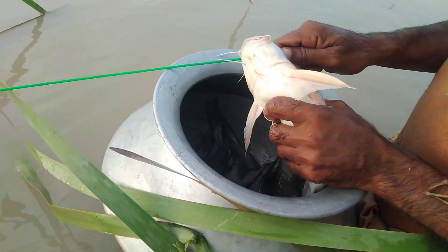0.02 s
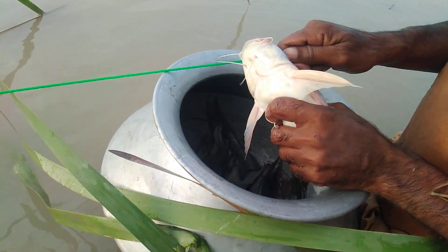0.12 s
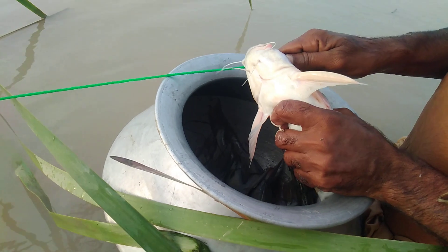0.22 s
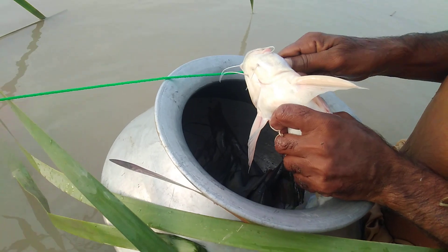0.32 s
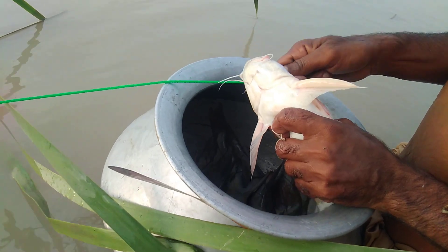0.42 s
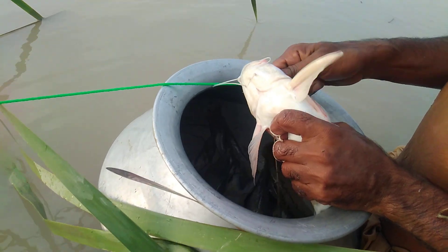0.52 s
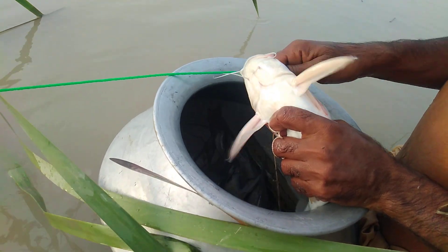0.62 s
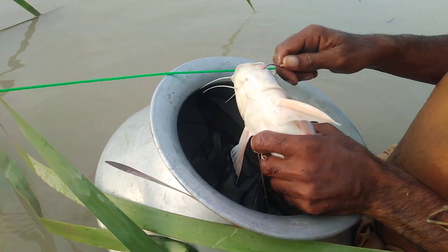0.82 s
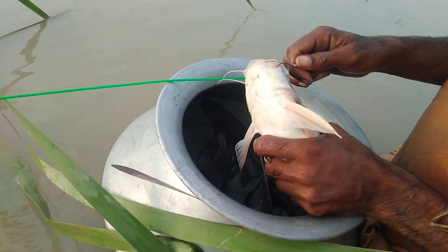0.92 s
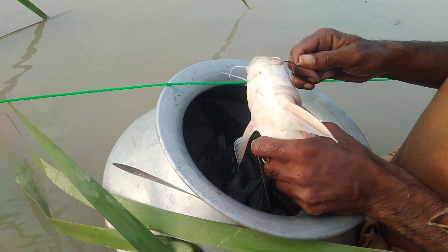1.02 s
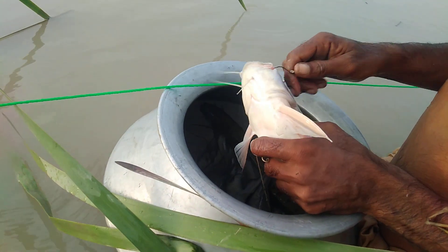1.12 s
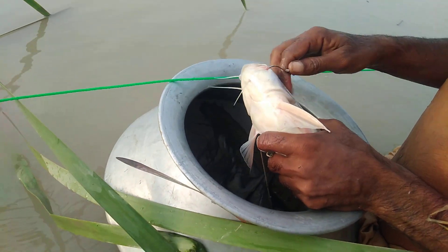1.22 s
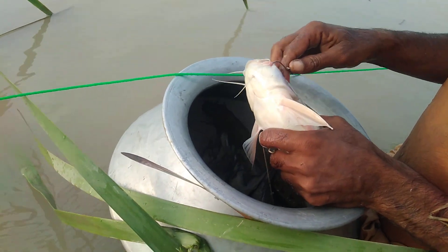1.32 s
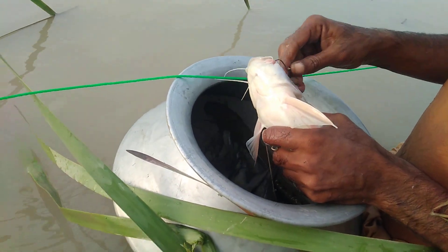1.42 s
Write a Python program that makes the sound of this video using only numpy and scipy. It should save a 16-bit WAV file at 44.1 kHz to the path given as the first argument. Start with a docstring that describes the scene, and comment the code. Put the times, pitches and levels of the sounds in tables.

```python
"""Light wind, small rubs and a soft knock on an aluminium pot lead into three gritty croaks of a catfish.
The fish, held over the pot at the water's edge, grinds its fin spines in their sockets.
Each croak is a run of ridge clicks that speeds up and slows down, ringing the body and shedding grit.
Hands and fishing line tick, rub and knock on the pot, which rings as a set of dying sines.
Wind is shaped noise with gusts on the microphone; a far insect is a narrow band of noise that pulses."""
import sys
import numpy as np
from scipy import signal
from scipy.fft import rfft, irfft, next_fast_len
from scipy.io import wavfile

SR = 44100
rng = np.random.default_rng(int(sys.argv[2]) if len(sys.argv) > 2 else 0)


def materialize(psi):
    """Save the field psi as 16-bit PCM at rate SR to the path in sys.argv[1].

    A 1-D psi becomes a single channel; in a 2-D psi each row is a channel.
    """
    bounded = np.clip(np.atleast_2d(psi).T, -1, 1)
    quanta = np.round(bounded * 32767).astype(np.int16)
    wavfile.write(sys.argv[1], SR, quanta)


N = 63945  # length in samples
T = np.arange(N) / SR  # time in seconds

# The tones of the metal pot. Each row: pitch in Hz, relative level in dB, time to fall by 60 dB in seconds.
POT_TONES = [(1098, -4, 0.12), (1232, 3, 0.2), (1400, -19, 0.17), (1444, -2, 0.082), (1616, -3, 0.12),
             (1703, 9, 0.066), (1700, -7, 0.1), (2210, -4.5, 0.027), (2304, -12, 0.13), (2720, -6, 0.081),
             (3267, -7.5, 0.12), (3610, -4, 0.066), (4345, -10, 0.14)]


def from_db(db):
    """Turn decibels into a gain."""
    return 10 ** (np.asarray(db) / 20)


def at_level(x, db, length):
    """Scale a sound so that its energy, spread over length seconds, has this rms level in dB."""
    rms = np.sqrt(np.sum(x ** 2) / (length * SR) + 1e-20)
    return x * from_db(db) / rms


def colour(x, points):
    """Filter with a spectrum given as (Hz, dB) points, reacting as early as possible (minimum phase)."""
    size = next_fast_len(2 * N) // 2 * 2
    hz, db = np.transpose(points)
    bins_hz = np.arange(size // 2 + 1) * SR / size
    gains = from_db(np.interp(np.log(bins_hz + 1), np.log(hz), db))
    # folding the cepstrum forward in time leaves no sound ahead of its cause
    cepstrum = irfft(np.log(gains))
    cepstrum[1:size // 2] *= 2
    cepstrum[size // 2 + 1:] = 0
    return irfft(rfft(x, size) * np.exp(rfft(cepstrum)))[:N]


def resonance(x, hz, width):
    """Let one band of width Hz resonate, with a gain of about one at its top."""
    r = np.exp(-np.pi * width / SR)
    feed = [(1 - r * r) / 2, 0, (r * r - 1) / 2]
    feedback = [1, -2 * r * np.cos(2 * np.pi * hz / SR), r * r]
    return signal.lfilter(feed, feedback, x + 1e-18)


def ring(x, modes):
    """Each click sets the modes ringing as dying sines, neighbours in opposite sense."""
    out = 0
    for k, (hz, db, t60) in enumerate(modes):
        r = np.exp(-np.log(1000) / (t60 * SR))
        w = 2 * np.pi * hz / SR
        tone = signal.lfilter([0, np.sin(w)], [1, -2 * r * np.cos(w), r * r], x + 1e-18)
        out = out + (-1) ** k * from_db(db) * tone
    return out


def fade(x, seconds):
    """Give each click an exponential tail that falls to 37 percent in the given seconds."""
    return signal.lfilter([1], [1, -np.exp(-1 / (seconds * SR))], x + 1e-18)


def clicks(times, sizes):
    """Place single-sample clicks at the given times."""
    places = np.round(np.asarray(times) * SR).astype(int)
    return np.bincount(np.clip(places, 0, N - 1), sizes, N)


def hump(middle, spread):
    """Swell and fall smoothly as a bell curve with this standard deviation in seconds."""
    return np.exp(-((T - middle) / spread) ** 2 / 2)


def noise(points):
    """Make coloured noise with an rms of one."""
    return at_level(colour(rng.standard_normal(N), points), 0, N / SR)


def ridge_times(start, fastest, end, first, top, last, jitter):
    """The spine speeds up and slows down; a click falls each time a ridge slips."""
    arch_up, arch_down = 0.91, 1.7  # radians of a sine that the speed follows on each side of its top
    t = np.linspace(start, end, num=400)
    speeding_up = t < fastest
    away = np.interp(t, [start, fastest, end], [1, 0, 1])  # 0 at the top speed, 1 at either end
    arch = np.where(speeding_up, arch_up, arch_down)
    slowest = np.where(speeding_up, first, last)
    rate = top - (top - slowest) * (np.sin(arch * away) / np.sin(arch)) ** 2
    passed = (np.cumsum(rate) - rate[0]) * (t[1] - t[0])  # ridges gone by so far
    ridges = np.arange(64) + jitter * rng.standard_normal(64)  # slightly uneven spacing
    return np.interp(ridges[ridges < passed[-1]], passed, t)


def fish_body(push, thump, index):
    """The clicks ring the fish's body and the air in the pot; each slip also gives a soft low push."""
    # Body resonances. Each row: pitch in Hz, width in Hz, relative dB in the first, second and third croak.
    body_bands = [(435, 144, 6.5, 4.5, -5.5), (761, 136, 7.5, 10, -19), (843, 204, 0.5, 9, 7),
                  (1093, 294, -2, -2.5, -2.5), (1433, 170, 0.5, 4, 1), (1772, 254, -4, -2, -0.5),
                  (2067, 143, -1.5, -9.5, -6), (2574, 57, 3, -5, 1), (3640, 470, -14.5, -38, -51)]
    out = 0
    for k, (hz, width, *gains) in enumerate(body_bands):
        out = out + (-1) ** k * from_db(gains[index]) * resonance(push, hz, width)
    pot_air = from_db(2) * resonance(push, 207, 8.3)
    soft_push = from_db(-2) * resonance(thump, 221.5, 117)
    return out + pot_air + soft_push


def fin_grit(scrape, tilt_db):
    """Each ridge snaps cleanly, rings the bone alike and sheds a short burst of noise."""
    # Sound of the grinding ridges. Each row: pitch in Hz, relative level in dB before the croak's tilt.
    grit_spectrum = [(400, -40), (1100, -20), (2400, -13), (3100, -13.5), (4500, -16.5), (5250, -27),
                     (5650, -37), (6500, -10), (7400, -2), (8600, -14), (9700, -11), (11900, -4),
                     (12800, -13), (13800, 0.5), (15600, 3)]
    grit_decay, bone_decay, bone_tail_decay = 0.00067, 0.0016, 0.0088  # seconds to fall to 37 percent
    bone_db, bone_tail_db, snap_db = -9, -6, 11  # bone and snap beside the bursts, tail beside the bone
    bursts = fade(scrape, grit_decay) * rng.standard_normal(N)
    bone_fade = np.exp(-T / bone_decay) + from_db(bone_tail_db) * np.exp(-T / bone_tail_decay)
    # one noise pattern serves every click, so the bone answers each the same way
    bone = signal.fftconvolve(scrape, rng.standard_normal(N) * bone_fade)[:N]
    tilted = [(hz, db + tilt_db * np.log2(hz)) for hz, db in grit_spectrum]
    return colour(bursts + from_db(bone_db) * bone + from_db(snap_db) * scrape, tilted)


def croak(index):
    """Ridge clicks of both fins drive the body and the grit of one spine stroke."""
    # Speed of each spine stroke. Each row: start, fastest moment and end in seconds,
    # then first, top and last speed in clicks per second.
    strokes = [(.498, .523, .556, 280, 398, 185), (.593, .624, .673, 305, 436, 215),
               (.707, .741, .790, 265, 456, 200)]
    # Voice of each stroke. Each row: body level in dB, grit level in dB, grit tilt in dB per octave.
    voices = [(-40.5, -38, -1.3), (-37, -33, -1.5), (-38.5, -35, 1)]
    # Roughness of each stroke. Each row: timing jitter as a share of a ridge, other fin's level in dB.
    roughness = [(.03, -16), (.055, -4), (.006, -30)]
    # Swell of each stroke. Each row: level at the start in dB, end of the rise in seconds,
    # start of the fall in seconds, level at the end in dB.
    swells = [(-4, .508, .542, -17), (-12, .613, .653, -15), (-9, .723, .765, -28)]
    other_fin_speed = 0.83  # beside the first fin
    click_spread_db, grit_spread_db = 0.7, 1.5  # chance differences between clicks
    thump_follows = 0.067  # share of the swell's dB that the soft push follows
    start, fastest, end, first, top, last = strokes[index]
    body_db, grit_db, tilt_db = voices[index]
    jitter, other_db = roughness[index]
    start_db, risen, falling, end_db = swells[index]
    push, scrape, thump = 0, 0, 0
    for speed, fin_db in ((1, 0), (other_fin_speed, other_db)):
        times = ridge_times(start, fastest, end, first * speed, top * speed, last * speed, jitter)
        swell = np.interp(times, [start, risen, falling, end], [start_db, 0, 0, end_db])
        chance = rng.standard_normal(size=(2, 64))[:, :len(times)]
        push = push + clicks(times, from_db(fin_db + swell + click_spread_db * chance[0]))
        scrape = scrape + clicks(times, from_db(fin_db + swell + grit_spread_db * chance[1]))
        thump = thump + clicks(times, from_db(fin_db + thump_follows * swell))
    body = at_level(fish_body(push, thump, index), body_db, end - start)
    return body + at_level(fin_grit(scrape, tilt_db), grit_db, end - start)


def line_ticks():
    """Line and fingers make short scratchy contacts that leave the pot ringing."""
    # Sharp ticks. Each row: time in seconds, contact level in dB, pot level in dB, decay in seconds.
    tick_list = [(0.3704, -42, -55.5, 0.0066), (0.492, -50.5, -60, 0.021), (0.917, -59, -58, 0.0075),
                 (1.059, -64, -54, 0.011), (1.15, -73, -59, 0.021), (1.189, -52, -59, 0.0074)]
    # Sound of the contact itself. Each row: pitch in Hz, relative level in dB.
    contact_spectrum = [(300, -56), (1150, -14), (1550, 16.5), (1900, 11), (2700, -1), (4500, 2),
                        (5800, -13), (7500, -4.5), (10000, -7), (15500, -1)]
    out = 0
    for time, contact_db, pot_db, decay in tick_list:
        burst = fade(clicks([time], [1]), decay) * rng.standard_normal(N)
        contact = at_level(colour(burst, contact_spectrum), contact_db, decay)
        out = out + contact + at_level(ring(burst, POT_TONES), pot_db, 2 * decay)
    return out


def pot_rubs():
    """Rubbing catches and slips in dense tiny grains, which hiss and drive the pot's tones."""
    # Rubs on the pot. Each row: middle in seconds, half length in seconds, level of the ringing in dB.
    rub_list = [(0.111, 0.011, -65.5), (0.152, 0.005, -63), (0.501, 0.0047, -48), (0.561, 0.022, -54.5),
                (0.831, 0.0052, -58.5), (1, 0.014, -68.5), (1.169, 0.0023, -53), (1.207, 0.0069, -54),
                (1.241, 0.0022, -51), (1.26, 0.024, -56.5), (1.427, 0.016, -51.5)]
    # Hiss of the rubbing. Each row: pitch in Hz, relative level in dB.
    hiss_spectrum = [(400, -29.5), (900, -9), (1200, 12), (1750, -6), (2400, -4), (4400, -19),
                     (5600, -13.5), (8000, -13.5), (15500, -27)]
    grains_per_s, hiss_db = 3000, -5.5  # hiss level is beside the ringing
    out = 0
    for middle, half, db in rub_list:
        falls = rng.random(N) < grains_per_s / SR
        grains = hump(middle, half / np.sqrt(2)) * falls * rng.standard_normal(N)
        ringing = at_level(ring(grains, POT_TONES), db, 2 * half)
        out = out + ringing + at_level(colour(grains, hiss_spectrum), db + hiss_db, 2 * half)
    return out


def handling_knocks():
    """Soft bumps of the handling each set off a few quickly dying low tones."""
    # Soft knocks. Each row: time in seconds, strength of the click in dB.
    knock_list = [(0.12, -60), (.225, -61), (0.3253, -43.5)]
    # Tones of a knock. Each row: pitch in Hz, relative level in dB, time to fall by 60 dB in seconds.
    knock_tones = [(375, 2.5, 0.03), (475, -0.5, 0.026), (780, 2, 0.0051), (1140, -4.5, 0.013)]
    times, db = np.transpose(knock_list)
    return ring(clicks(times, from_db(db)), knock_tones)


def tail(x, points, db, t60):
    """Trail a sound with coloured noise that falls by 60 dB in t60 seconds, db beside the sound itself."""
    response = colour(rng.standard_normal(N) * np.exp(-np.log(1000) * T / t60), points)
    return at_level(signal.fftconvolve(x, response)[:N], db, np.sum(x ** 2) / SR)


def pot_shimmer(handling):
    """The pot's many close tones blur into a dense after-ring."""
    # Colour of the after-ring. Each row: pitch in Hz, relative level in dB.
    shimmer_spectrum = [(500, -23), (1100, -19.5), (1650, -5), (2300, 4.5), (2900, -16), (6000, -25),
                        (15000, -53)]
    return tail(handling, shimmer_spectrum, db=-10, t60=0.36)


def shore_scatter(near):
    """Bank and water scatter the near sounds into a short diffuse tail."""
    # Colour of the scatter. Each row: pitch in Hz, relative level in dB.
    scatter_spectrum = [(200, -1), (700, 2.5), (1500, 1.5), (5000, 7.5), (15000, -5.5)]
    return tail(near, scatter_spectrum, db=-19, t60=0.17)


def wind():
    """Steady outdoor noise runs throughout, and low noise swells in gusts on the microphone."""
    # Gusts. Each row: middle in seconds, half length in seconds, level at the top in dB.
    gust_list = [(0.223, 0.016, -40), (0.301, 0.059, -42.5), (0.432, 0.098, -52.5)]
    # Colour of the gusts. Each row: pitch in Hz, relative level in dB.
    gust_spectrum = [(20, -12), (40, 14), (65, -6), (110, -5.5), (250, -25.5), (1000, -56.5)]
    # Colour of the outdoor background. Each row: pitch in Hz, relative level in dB.
    outdoor_spectrum = [(20, 3), (55, 0), (100, -5), (190, -8), (290, -21), (800, -25), (1400, -24),
                        (2600, -34), (5000, -40.5), (6100, -38.5), (8000, -40.5), (15500, -37.5)]
    steady = from_db(-54.5) * noise(outdoor_spectrum)
    swelling = sum(from_db(db) * hump(middle, half / np.sqrt(2)) for middle, half, db in gust_list)
    return steady + noise(gust_spectrum) * swelling


def insect():
    """A far insect chirrs: a thin band of noise throbs 29 times a second."""
    # Chirrs. Each row: middle in seconds, spread (standard deviation) in seconds, level at the top in dB.
    chirr_list = [(0.057, 0.057, -77.5), (1.388, 0.094, -78.5)]
    throb = 1 + 0.5 * np.sin(2 * np.pi * 29 * T)
    thin_band = resonance(rng.standard_normal(N), hz=6120, width=110)
    tone = at_level(thin_band * throb, 0, N / SR)
    return tone * sum(from_db(db) * hump(middle, spread) for middle, spread, db in chirr_list)


def scene():
    """Add up the fish, the handling, the pot's answers, the shore, the wind and an insect."""
    fish = sum(croak(index) for index in range(3))
    fish_in_pot = from_db(-58.5) * ring(fish, POT_TONES)
    handling = line_ticks() + pot_rubs()
    near = fish + fish_in_pot + handling + pot_shimmer(handling) + handling_knocks()
    return (near + shore_scatter(near) + wind() + insect())[None]


def record(dry):
    """Cut the treble steeply around 15950 Hz."""
    low_pass = signal.firwin(301, 15950, fs=SR, window=("kaiser", 7))
    return signal.fftconvolve(dry, low_pass[None], mode="same", axes=1)


dry = scene()
out = record(dry)
materialize(out)
```